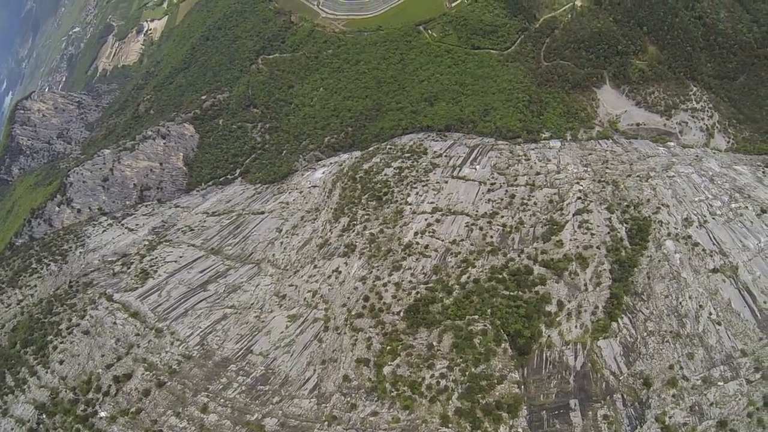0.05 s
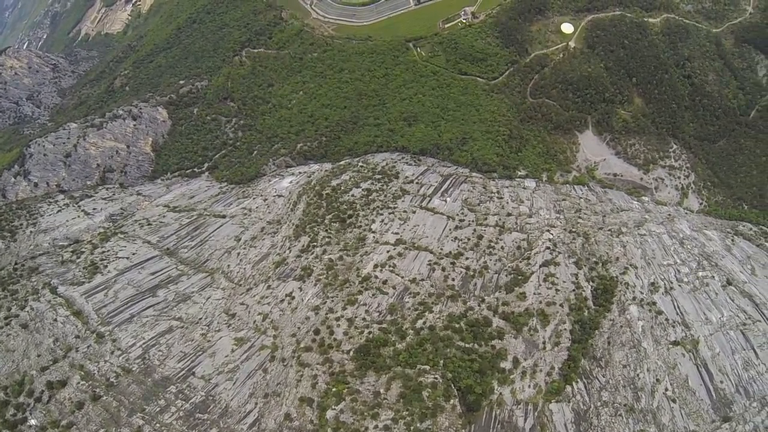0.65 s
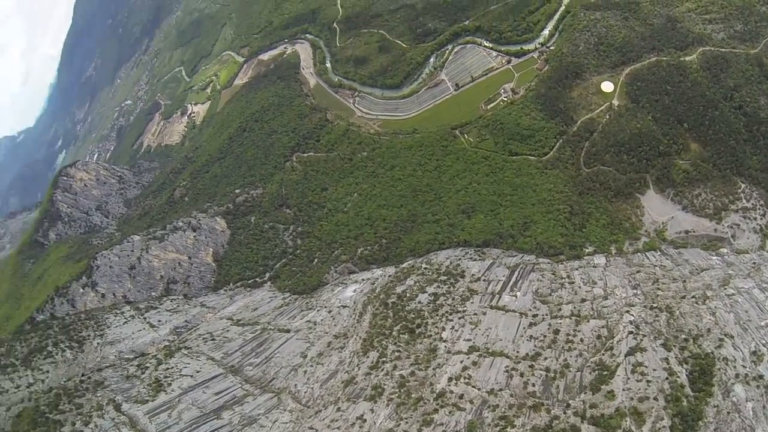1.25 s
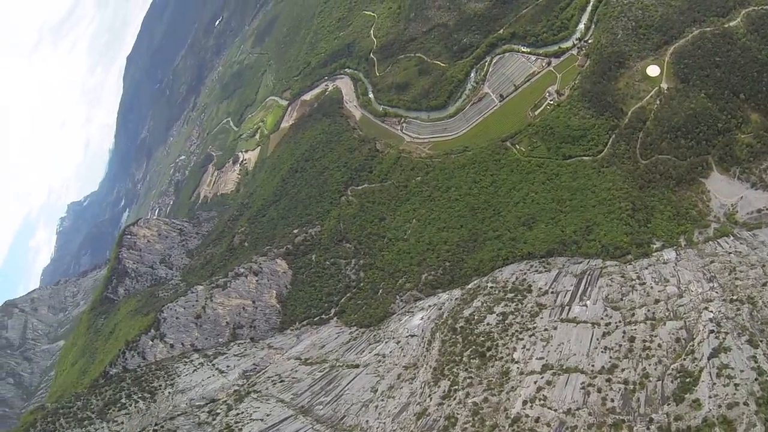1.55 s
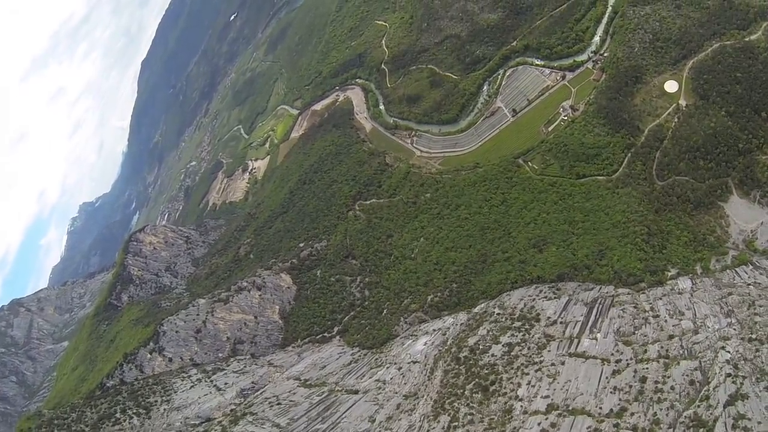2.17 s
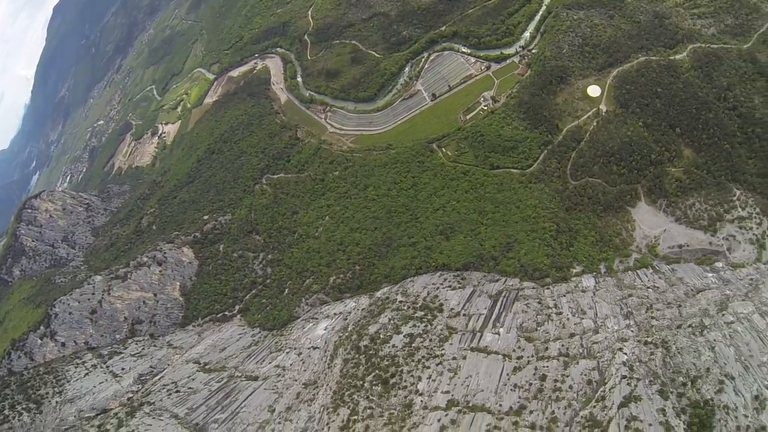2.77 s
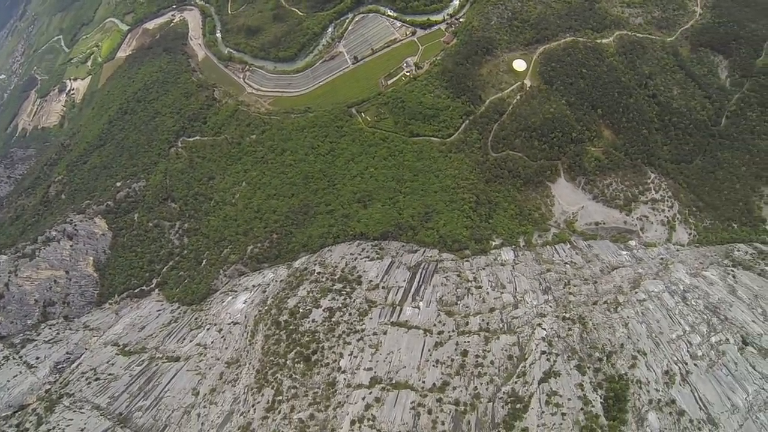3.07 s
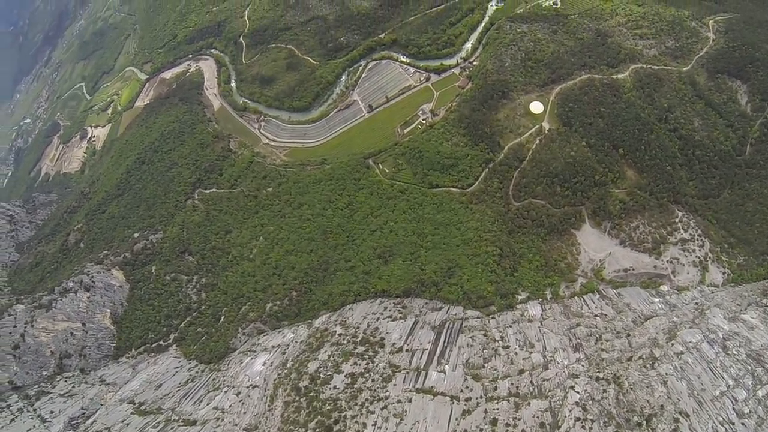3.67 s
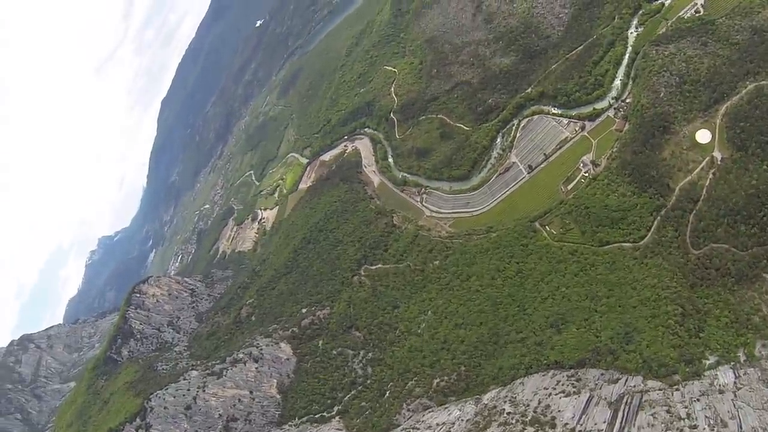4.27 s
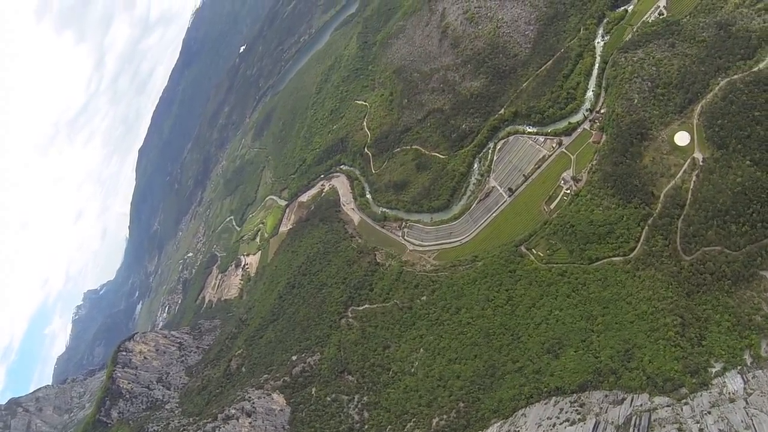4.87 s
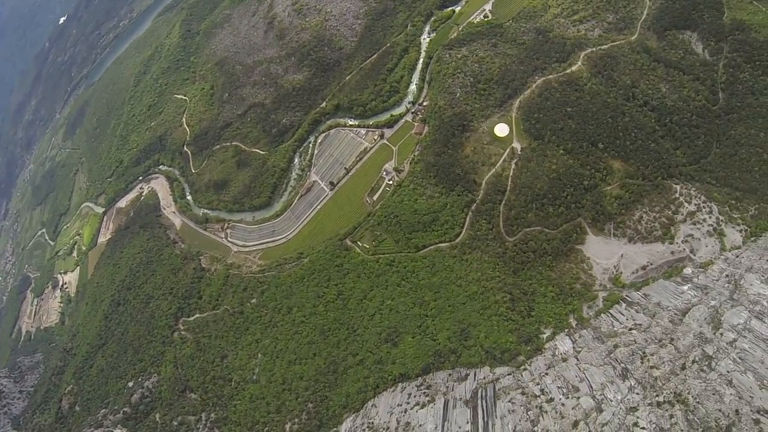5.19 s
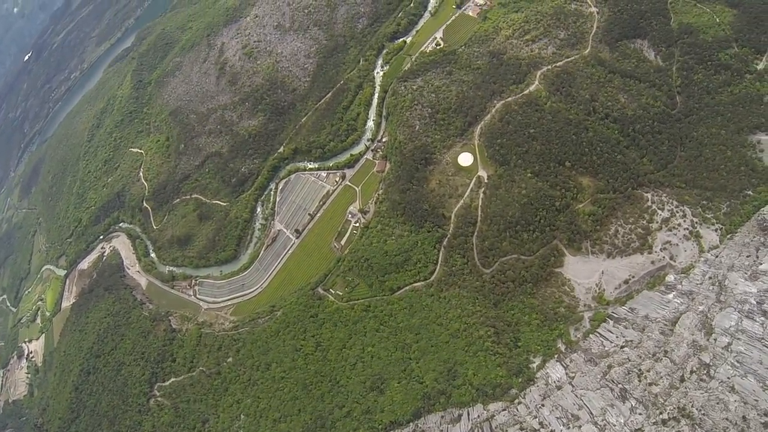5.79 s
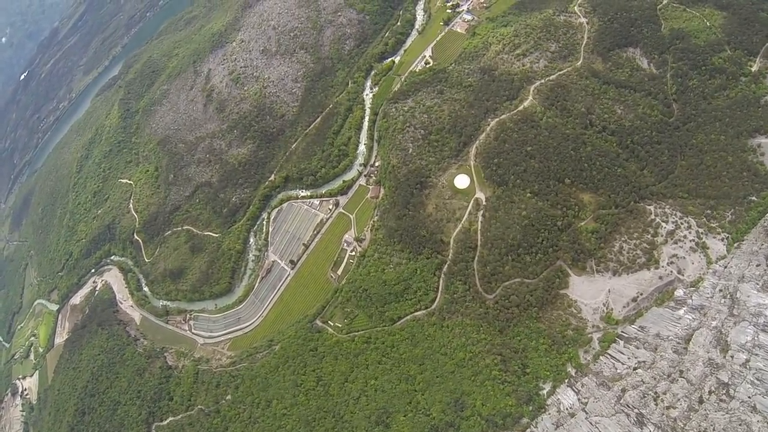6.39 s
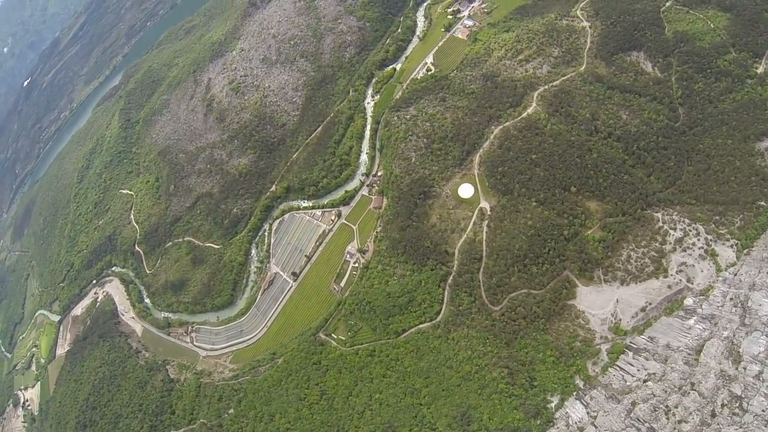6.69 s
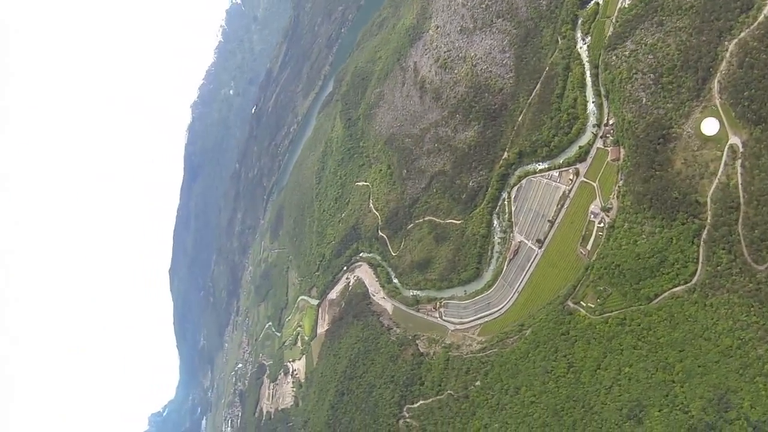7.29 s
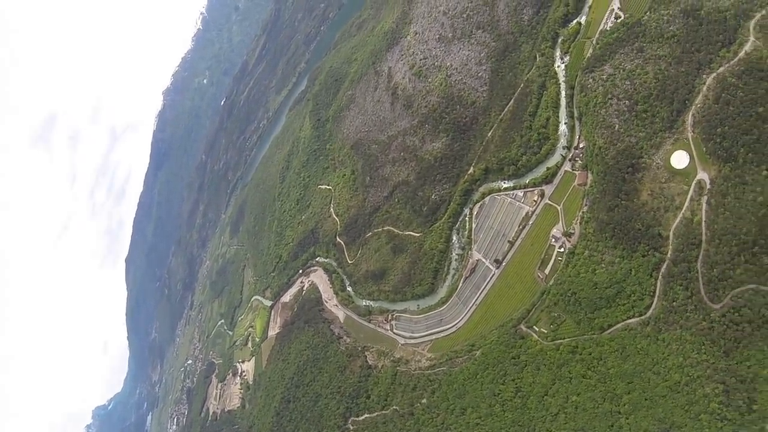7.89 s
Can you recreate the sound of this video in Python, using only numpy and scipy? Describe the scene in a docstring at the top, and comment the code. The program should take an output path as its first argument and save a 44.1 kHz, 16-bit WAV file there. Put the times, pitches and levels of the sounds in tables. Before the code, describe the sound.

Strong wind howls with a hollow tone across a microphone in fast flight, over booming low buffets and a fluttering hiss.

```python
"""Wind howling in the hollows of a camera housing, on a fast glide down a mountainside.
One microphone, on the camera itself, right in the airstream. Behind the howl, large eddies buffet
the microphone and boom in the bass, and fine turbulence hisses on the housing's edges.
The balance shifts as the camera turns in the flow; its limiter holds down the highest peaks."""
import sys
import numpy as np
from scipy import signal
from scipy.fft import rfft, irfft, next_fast_len
from scipy.io import wavfile
from scipy.ndimage import uniform_filter1d, minimum_filter1d, map_coordinates

SR = 44100
rng = np.random.default_rng(int(sys.argv[2]) if len(sys.argv) > 2 else 0)


def generate_wav(sig):
    """Save sig (samples, or channels by samples) to the path in sys.argv[1] as 16-bit PCM at SR."""
    pcm = np.round(np.clip(np.atleast_2d(sig).T, -1, 1) * 32767).astype(np.int16)
    wavfile.write(sys.argv[1], SR, pcm)


N = 355005

# Spectra of the flow noises, bass to treble: frequency_hz, relative_db
BUFFET_SPECTRUM = [(7, -24), (19, -2), (32, -5.5), (60, -1.5), (90, -9), (200, -20.5), (500, -80)]
BOOM_SPECTRUM = [(30, -47), (76, -10.5), (108, 1), (136, -4), (163, -6), (190, -11.5), (208, -12),
                 (232, -19.5), (300, -27.5), (450, -37), (900, -80)]
CHURN_SPECTRUM = [(100, -25), (230, 0.5), (350, 0), (450, -2.5), (560, -4.5), (800, -19), (2000, -70)]
BLOW_SPECTRUM = [(300, -67), (540, -22), (600, -8.5), (790, -11), (900, -8.5), (1080, -5), (1250, -7),
                 (1600, -15.5), (3000, -80)]
HOWL_SPECTRUM = [(700, -52), (1050, -18.5), (1190, -11), (1320, 0), (1430, 0.7), (1520, 0.2), (1720, -9),
                 (1950, -17), (2300, -24.5), (4000, -73)]
RUSH_SPECTRUM = [(1200, -36), (1850, 2), (2030, 0), (2170, -3), (2650, -2.5), (2830, -8.5), (3100, -11),
                 (3600, -16), (5000, -47), (9000, -80)]
HISS_SPECTRUM = [(1800, -52), (2800, -2.5), (3100, -2), (3620, 1.5), (4000, -8.5), (4350, -11), (5850, -10),
                 (6950, -17.5), (7700, -17), (8700, -21), (10000, -33.5), (15000, -70)]
FIZZ_SPECTRUM = [(5000, -40), (8300, -10), (9500, 0), (10700, -2.5), (11500, -4.5), (13200, -6.5),
                 (14200, -12), (15200, -19)]
# Air resonances of the housing and its openings: pitch_hz, width_hz, lift_db
HOUSING_RESONANCES = [(623, 50, 2.5), (890, 62, 4.5), (1076, 98, 7), (2605, 86, 3), (3090, 150, 3.5),
                      (3450, 140, 2), (4740, 460, 6), (6240, 200, 2.5), (7420, 330, 6), (10860, 500, 3.5),
                      (12000, 500, 1)]
# Flow along the housing's edges, which hisses and sheds booming eddies: time_s, relative_db
EDGE_STREAM = [(0.0, -32.1), (0.13, -31), (0.78, -32.0), (1.4, -27.5), (1.58, -27), (1.8, -30.6),
               (2.28, -30), (2.45, -31.5), (2.98, -32.1), (3.73, -28), (3.98, -30.5), (4.38, -28),
               (4.6, -31), (5.25, -28.4), (5.48, -31.5), (6.93, -30.5), (7.3, -32.0), (8.05, -28)]
# Strength of the rush around 2 kHz: time_s, relative_db
RUSH_CURVE = [(0.0, -29.5), (0.4, -27.5), (1.0, -31), (1.75, -26.5), (1.98, -30.5), (2.1, -24.5),
              (3.03, -32.5), (3.85, -26.3), (5.0, -25.5), (5.08, -31), (5.35, -26.5), (5.55, -29.5),
              (6.83, -28), (7.13, -31), (7.3, -27.5), (8.05, -26)]
# Pressure of large eddies on the microphone: time_s, relative_db
EDDY_PRESSURE = [(0.0, -23.8), (0.42, -31.0), (0.98, -31), (1.58, -30), (1.7, -34), (2.15, -32.5),
                 (2.5, -38.6), (3.73, -23), (3.85, -36), (4.08, -26.5), (5.13, -36.5), (8.05, -31.5)]
# Single strong eddies that thump in the bass: centre_s, relative_db
EDDY_THUMPS = [(0.271, -6.5), (0.549, -11), (0.959, -15), (1.179, -7), (1.359, -8), (1.599, -6.5),
               (2.339, -6.5), (2.419, -7), (3.719, -9), (4.159, -6.5), (4.339, -7), (4.439, -7),
               (4.579, -9), (5.199, -9), (5.338, -11), (5.971, -10), (6.299, -12), (6.719, -11),
               (6.895, -8.5)]
# Brief lulls in the boom: centre_s, change_db
BOOM_LULLS = [(0.69, -4.5), (2.56, -3.5), (4.03, -4), (5.77, -2.5), (7.06, -5)]
# Churning in the camera's wake, apart from the turn: time_s, relative_db
WAKE_CURVE = [(0, -34.5), (.5, -32), (1.05, -36.5), (1.45, -30), (1.9, -34.5), (2.28, -32), (3.1, -36),
              (3.5, -34.5), (3.9, -29), (4.9, -32), (5.6, -34.5), (7.7, -33.5), (8.05, -31)]
# Flow across the openings, which makes them howl: time_s, relative_db
CROSS_STREAM = [(0, -16), (.2, -18), (.35, -13.5), (.72, -14.5), (.93, -19.5), (1.65, -16.5), (2.5, -18.5),
                (2.75, -17), (2.95, -20), (3.8, -17.5), (4.6, -19.5), (4.95, -17), (5.08, -20.5),
                (5.25, -16), (6.1, -17.5), (6.3, -16.5), (6.88, -16), (7.13, -20), (8.05, -16)]
# Brief gusts across the openings: centre_s, flow_lift_db
CROSS_GUSTS = [(3.83, 3.5), (5.38, 1), (7.86, 1)]

# Base level of each layer
RUSH_DB, HISS_DB, FIZZ_DB = -27.5, -30, -49.5
BUFFET_DB, BOOM_DB, CHURN_DB, BLOW_DB, HOWL_DB = -30.5, -20.5, -33.5, -25.5, -17.5
# dB that a layer gains for each dB of the flow that drives it
RUSH_GROWS, FIZZ_GROWS, BOOM_GROWS, BLOW_GROWS, HOWL_GROWS = 1.03, 0.81, 0.57, 1.35, 0.8
BLOW_FROM_EDGE, HOWL_FROM_EDGE = -0.17, 0.35  # edge flow starves the openings, feeds the main hollow
THUMP_S, LULL_S, GUST_S = 0.03, 0.047, 0.037  # half lengths
THUMP_TRIM_DB, BOOM_FADE_DB_PER_S = -9.5, 0.24
TURN_ASIDE_S, TURN_BACK_S, TURNING_S = 5.08, 7.13, 0.16
TURN_BOOM_DB, TURN_CHURN_DB, TURN_BLOW_DB = -1.3, -5, 0.2  # change while turned aside
LIMITER_CEILING, LIMITER_WINDOW_S, TOP_HZ = 0.87, 0.0067, 15200


def amp(db):
    """Decibels to gain."""
    return 10 ** (np.asarray(db) / 20)


def unit(x):
    """x at rms 1."""
    return x / np.sqrt(np.mean(x ** 2) + 1e-20)


def wobble(rate_hz):
    """A smooth random curve with rate_hz knots a second."""
    knots = rng.standard_normal(int(N * rate_hz / SR) + 4)
    return map_coordinates(knots, [np.arange(N) * rate_hz / SR])


def swing(rows):
    """A time_s, relative_db table as a curve in dB around its mean."""
    db = np.interp(np.arange(N) / SR, *np.transpose(rows))
    return db - db.mean()


def swell(centre_s, half_length_s):
    """A bell-shaped rise and fall of height 1."""
    return np.exp(-((np.arange(N) / SR - centre_s) / half_length_s) ** 2)


def turned():
    """0 while the camera faces the flow, 1 while it is turned aside."""
    t = np.arange(N) / SR
    return np.clip(np.minimum(t - TURN_ASIDE_S, TURN_BACK_S - t) / TURNING_S + 0.5, 0, 1)


def filtered(x, response):
    """x times a gain that depends on frequency."""
    size = next_fast_len(N + 8192)
    return irfft(rfft(x, size) * response(np.fft.rfftfreq(size, 1 / SR)), size)[:N]


def housing_db(hz):
    """The air in the housing lifts the frequencies near its resonances."""
    return sum(lift_db / (1 + (2 * (hz - pitch_hz) / width_hz) ** 2) ** 1.2
               for pitch_hz, width_hz, lift_db in HOUSING_RESONANCES)


def turbulence(spectrum):
    """Flow noise of rms 1, heard through the housing."""
    knots_hz, knots_db = np.transpose(spectrum)
    colour = lambda hz: amp(np.interp(np.log(hz + 1), np.log(knots_hz), knots_db) + housing_db(hz))
    return unit(filtered(rng.standard_normal(N), colour))


def sustained(x, span_s, evenness):
    """Steadily driven noise: its strength strays less over span_s, its fast flutter stays."""
    power = np.abs(uniform_filter1d(x ** 2, int(span_s * SR))) + 1e-6
    return unit(x / power ** (evenness / 2))


def drifting(x, depth_db, width_hz, span_s):
    """Broad patches of colour come and go at random, as when the angle of the flow changes."""
    size = 1024
    spectra = signal.stft(x, nperseg=size)[2]
    patches = rng.standard_normal(spectra.shape)
    for _ in range(2):
        patches = uniform_filter1d(patches, int(width_hz * size / SR), axis=0)
        patches = uniform_filter1d(patches, int(2 * span_s * SR / size), axis=1)
    coloured = spectra * amp(depth_db * unit(patches))
    return unit(signal.istft(coloured, nperseg=size)[1][:N])


def wake_churn():
    """The stream churns just behind the housing, more quietly while the camera is turned aside."""
    level_db = CHURN_DB + swing(WAKE_CURVE) + TURN_CHURN_DB * turned() + wobble(14)
    return amp(level_db) * sustained(turbulence(CHURN_SPECTRUM), span_s=0.1, evenness=0.45)


def microphone_buffet():
    """Large eddies push directly on the microphone."""
    level_db = BUFFET_DB + swing(EDDY_PRESSURE) + 1.7 * wobble(12)
    return amp(level_db) * sustained(turbulence(BUFFET_SPECTRUM), span_s=0.1, evenness=0.76)


def edge_hiss(edge_db):
    """Ever smaller eddies on the edges; they flutter together with the local air speed."""
    flutter = amp(0.25 * wobble(22))
    rush = drifting(turbulence(RUSH_SPECTRUM), depth_db=1.46, width_hz=220, span_s=0.93)
    hiss = drifting(turbulence(HISS_SPECTRUM), depth_db=0.6, width_hz=390, span_s=0.48)
    fizz = drifting(turbulence(FIZZ_SPECTRUM), depth_db=-0.2, width_hz=500, span_s=0.3)
    rush *= amp(RUSH_DB + RUSH_GROWS * swing(RUSH_CURVE))
    hiss *= amp(HISS_DB + edge_db)
    fizz *= amp(FIZZ_DB + FIZZ_GROWS * edge_db)
    return flutter * (rush + hiss + fizz)


def eddy_boom(edge_db):
    """Eddies shed by the camera body boom around one pitch, the strongest as thumps."""
    lulls_db = sum(db * swell(s, LULL_S) for s, db in BOOM_LULLS)
    fade_db = -BOOM_FADE_DB_PER_S * (np.arange(N) - N / 2) / SR
    level_db = BOOM_DB + BOOM_GROWS * edge_db + TURN_BOOM_DB * turned()
    level_db += fade_db + lulls_db + 1.05 * wobble(18)
    thumps = sum(amp(db + THUMP_TRIM_DB) * swell(s, THUMP_S) for s, db in EDDY_THUMPS)
    envelope = np.hypot(amp(level_db), thumps)  # their powers add
    return envelope * sustained(turbulence(BOOM_SPECTRUM), span_s=0.074, evenness=0.61)


def housing_howl(edge_db):
    """Right at the microphone, air blows across the housing's openings and sounds its main hollow."""
    gusts_db = sum(db * swell(s, GUST_S) for s, db in CROSS_GUSTS)
    cross_db = swing(CROSS_STREAM) + gusts_db + 0.35 * wobble(16)
    blow_db = BLOW_DB + BLOW_GROWS * cross_db + BLOW_FROM_EDGE * edge_db
    blow_db += TURN_BLOW_DB * turned() + 0.5 * wobble(25)
    howl_db = HOWL_DB + HOWL_GROWS * cross_db + HOWL_FROM_EDGE * edge_db + 0.63 * wobble(12)
    blow = amp(blow_db) * sustained(turbulence(BLOW_SPECTRUM), span_s=0.09, evenness=0.55)
    howl = amp(howl_db) * sustained(turbulence(HOWL_SPECTRUM), span_s=0.098, evenness=0.62)
    return blow + howl


def scene():
    """All the wind, close up, at the camera's one microphone."""
    edge_db = swing(EDGE_STREAM)
    background = wake_churn() + microphone_buffet() + edge_hiss(edge_db) + eddy_boom(edge_db)
    return (background + housing_howl(edge_db))[None]


def record(dry):
    """The camera's limiter holds down the highest peaks; nothing is kept above its band limit."""
    window = int(LIMITER_WINDOW_S * SR)
    needed_gain = np.minimum(1, LIMITER_CEILING / (np.abs(dry[0]) + 1e-9))
    gain = uniform_filter1d(minimum_filter1d(needed_gain, window), window)
    return filtered(dry[0] * gain, lambda hz: hz < TOP_HZ)[None]


dry = scene()
out = record(dry)
generate_wav(out)
```